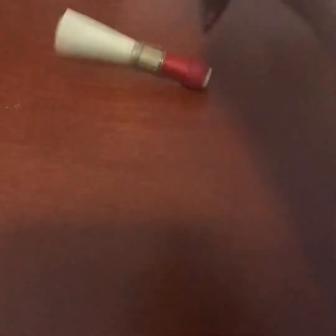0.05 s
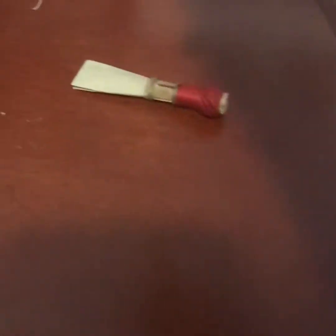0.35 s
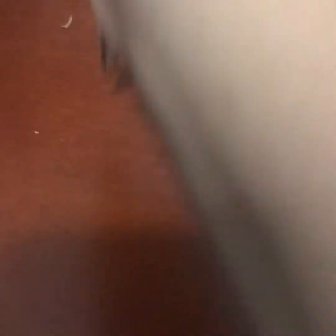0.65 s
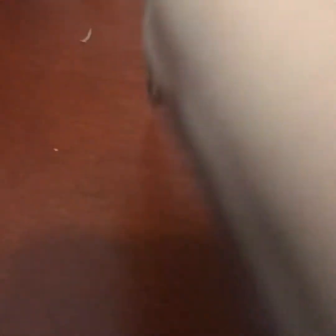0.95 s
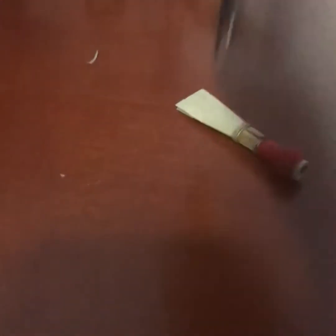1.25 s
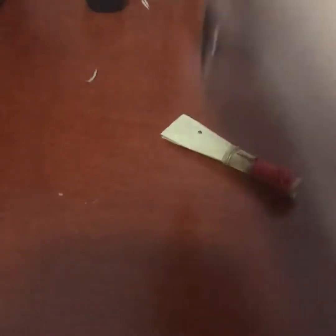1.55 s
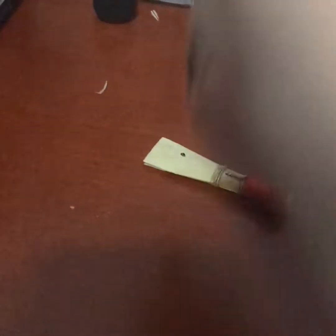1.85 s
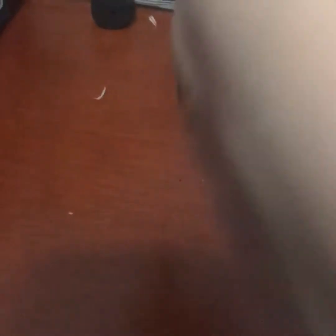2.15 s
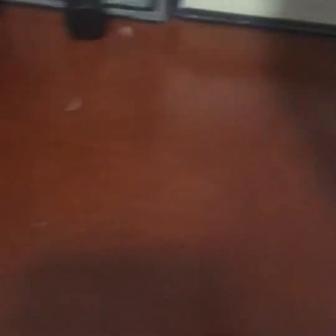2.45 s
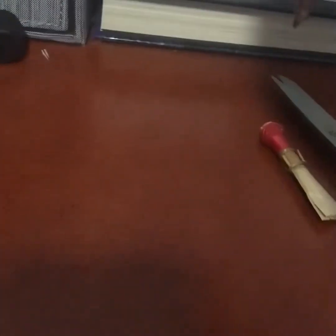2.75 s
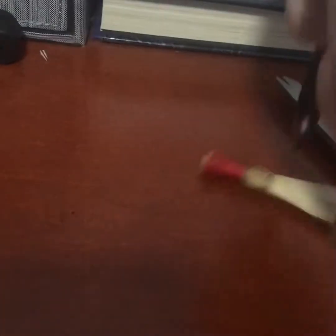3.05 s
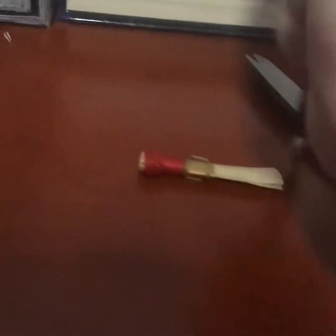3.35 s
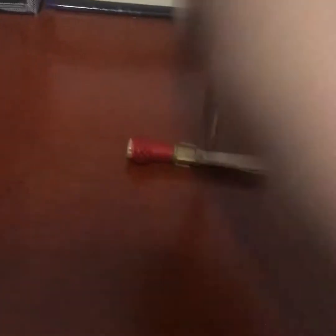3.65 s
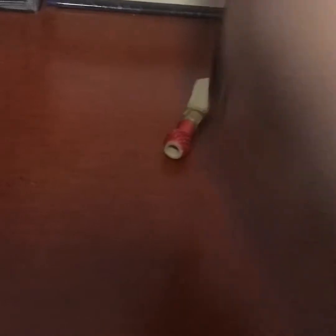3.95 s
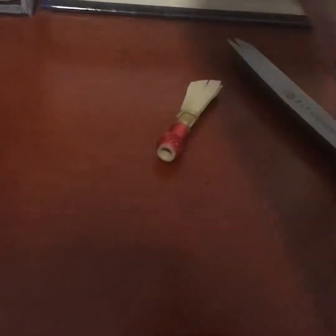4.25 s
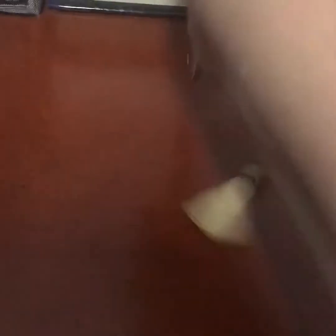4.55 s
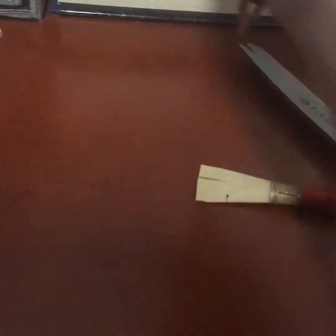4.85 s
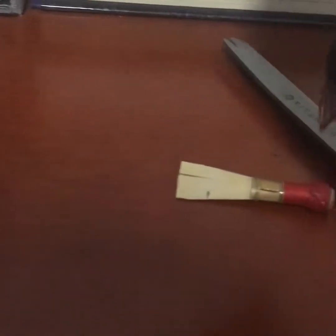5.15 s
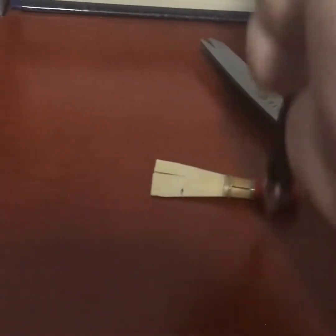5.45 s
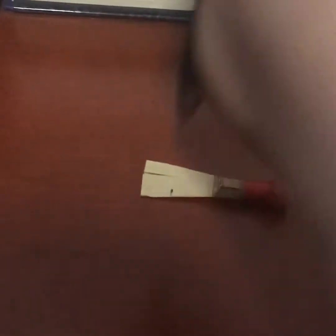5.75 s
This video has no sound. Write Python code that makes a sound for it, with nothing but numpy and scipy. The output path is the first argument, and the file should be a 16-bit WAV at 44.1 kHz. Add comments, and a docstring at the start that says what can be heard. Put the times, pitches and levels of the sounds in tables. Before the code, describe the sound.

Close, irregular cracks and hollow thumps as a metal tool strikes a light reed on a wooden tabletop, making it bounce and rattle.

```python
"""A hand jabs a steel tool down at a small wire-bound cane reed lying on a wooden desk, close to the microphone.
Each jab cracks on the cane, thumps the desk and rebounds once; the light reed then hops, rolls and skitters to rest.
A small room answers briefly, over a low rumble and a faint hiss that steps up and down."""
import sys
import numpy as np
from scipy import signal
from scipy.fft import rfft, irfft, next_fast_len
from scipy.io import wavfile
from scipy.ndimage import uniform_filter1d

SR = 44100
rng = np.random.default_rng(int(sys.argv[2]) if len(sys.argv) > 2 else 0)


def master_out(mix):
    """Clip the mix to full scale and print it as 16-bit PCM to the path in sys.argv[1]."""
    frames = np.transpose(np.atleast_2d(mix))
    ceiling = np.clip(frames, -1, 1)
    pcm = np.round(ceiling * 32767).astype(np.int16)
    wavfile.write(sys.argv[1], SR, pcm)


N = 260145

# desk modes: (Hz, dB, t60 s, polarity at the microphone)
DESK = [(49.7, -31.5, 0.24, 1), (70.4, -26.5, 0.13, -1), (108.7, -23, 0.106, -1), (164, -19, 0.047, 1),
        (240, -15, 0.019, 1), (323.2, -17.5, 0.06, 1), (379.5, -27, 0.13, -1), (394, -17.5, 0.061, -1),
        (450, -6, 0.011, -1), (615, -8, 0.014, -1), (641, -8.5, 0.022, 1), (805, -14.5, 0.0055, 1)]
# the reed's lasting ring: (Hz, dB, t60 s)
REED = [(3390, -18.5, 0.029), (3820, -21.5, 0.017), (4120, -14.5, 0.019)]
# the reed rocking between hops: (start s, end s, dB)
SKITTERS = [(.055, 0.18, -63), (0.19, 0.381, -59), (0.403, 0.484, -72), (0.68, 0.805, -65), (0.944, 0.988, -56.5), (1.406, 1.517, -56), (1.72, 1.833, -54), (2.015, 2.047, -47), (2.104, 2.322, -56), (3.781, 3.955, -58.5), (4.549, 4.718, -62)]
# spectrum of that rocking: (Hz, dB)
ROCKING = [(400, -5), (900, -8), (1400, -2.5), (1700, -8), (2400, -9), (3400, 6.5), (4250, 4), (5000, -21), (8000, -11.5), (11000, -16.5), (16000, -12)]
HISS = [(180, -42.5), (300, -11.5), (348, 3), (486, -2.5), (574, -4), (1080, -7), (6200, -11), (12900, -15), (16000, -12.5)]  # (Hz, dB)
RUMBLE = [(15, -37.5), (25, -7.5), (64, -1.5), (183, -14), (216, -20), (284, -13), (374, -22.5), (405, -16.5), (440, -24.5),
          (1200, -30.5), (1560, -60), (2640, -120)]  # (Hz, dB)
ROOM_DECAY = [(100, 0.39), (400, 0.3), (1200, 0.17), (4000, 0.29), (14000, 0.13)]  # (Hz, t60 s)
ROOM_COLOUR = [(60, -4), (200, 3), (400, -1), (900, 6.5), (1350, 2.5), (1650, 2.5), (2600, 0), (3800, -8), (5200, -4.5), (8000, -4.5), (11000, -7), (15000, 0)]  # (Hz, dB)
BANDS = [(800, 2400), (2400, 5000), (5000, 7600), (9200, 15600)]  # fixed; hollow, cane, edge and sparkle ranges: (low Hz, high Hz)
TOP_HZ = 16200  # fixed
# the desk top's quick upper modes, rung by any hard contact: (Hz, dB at the first spot, dB at the second spot, t60 s)
TOP_MODES = [(266, -8, -19, 0.13), (387, -8, -10.5, 0.14), (560, -10.5, -13, 0.022), (862, -11, -16, 0.05), (1028, -11, -19, .03),
             (1230, -15.5, -8.5, .025), (1340, -2, -22, 0.03), (1826, -13, -12.5, 0.024), (2366, -19.5, -11.5, 0.0053)]
# jabs that pin the reed to the desk: (s, thump dB, crack dB, cane pitch Hz, treble dB, tool's rebound after s, rebound dB)
JABS = [(0.6515, -4.5, -19, 3026, -5, 0.027, -32.5), (0.9973, -3.5, -22, 3020, 1, 0.025, -34.5), (1.3907, -16, -17.5, 3080, 4, 0.032, -45),
        (1.7031, -12.5, -19, 2520, 2.5, .037, -41.5), (2.0047, -2, -12, 4140, -5, 0.0093, -33.5), (2.3168, -4, -24.5, 3870, 1, 0.024, -49),
        (3.073, -0.55, -25, 2606, 2, 0.03, -43), (3.417, -1.2, -21.5, 4370, 1.5, 0.028, -35), (3.7664, -2, -24.5, 2420, 3, .027, -37.5),
        (4.0935, -1.1, -20.5, 2520, -2, 0.028, -37), (4.5353, -1, -20, 3360, -3, .0315, -40.5), (5.4821, -3, -21.5, 4280, -3, 0.034, -43)]
# glancing taps of the tool on the cane, often just ahead of a jab: (s, level dB, cane pitch Hz, treble dB)
TAPS = [(0.103, -19, 3730, -6.5), (0.1757, -18.5, 3020, -7.5), (0.6475, -23, 3723, -2), (0.9352, -29, 3990, -2),
        (1.699, -20.5, 3290, 4), (1.9977, -21.5, 3220, -5), (2.0011, -20, 4110, 1.5), (2.0969, -18, 3400, -7.5),
        (3.062, -22.5, 4370, -2), (3.7592, -15, 3500, -11), (4.5307, -28.5, 3460, 10)]
# the reed's louder landings: (s, level dB, cane pitch Hz, treble dB)
HOPS = [(0.0772, -39, 3340, -22), (0.207, -38, 3100, -17), (0.221, -35, 3000, -26), (0.2589, -28, 3980, -23), 
        (0.2778, -48, 4170, -4), (0.2953, -46.5, 4030, -3), (0.322, -48, 4150, 1), (0.3343, -33, 3970, -9),
        (0.3815, -39, 3720, -11), (0.719, -29, 3390, -5), (0.757, -31.5, 4110, -7), (0.776, -41, 4160, -4.5),
        (1.0636, -44, 3170, 0), (1.1791, -46.5, 3030, 0), (1.2576, -48, 4180, -4), (1.455, -39, 3200, -2),
        (1.475, -32, 3820, -13.5), (1.7715, -32, 3500, -4), (1.8174, -34.5, 3610, -9), (2.126, -30.5, 2815, -30),
        (2.174, -31, 2900, -12), (2.1992, -31, 2820, -31), (2.2535, -38.5, 2897, -26), (3.167, -36.5, 3900, -4.5),
        (3.8098, -25.5, 3680, -22), (3.8252, -34.5, 3750, -6), (3.8625, -42, 3670, 3), (3.9003, -40.5, 2586, -8),
        (4.5988, -45, 2450, -20), (4.6268, -45, 2440, -18), (4.6535, -45, 2420, -13), (4.6723, -47.5, 2464, -3)]
# the rolling reed tips over its wire collar and rings freely: (s, level dB)
ROLLS = [(3.1056, -36), (3.133, -36), (3.1949, -39), (3.209, -43), (3.2301, -39.5), (3.2547, -42.5),
         (3.2664, -47), (3.2769, -49.5), (4.5852, -41.5), (4.7092, -44), (4.7173, -50), (4.7399, -50), (4.757, -58)]
# colour of each kind of contact, relative to the cane: (hollow dB, edge dB, sparkle dB, glint Hz)
JAB_COLOUR, REBOUND_COLOUR, TAP_COLOUR = (-2.2, -4.5, -2, 10199), (-3, -1.5, 5, 9200.5), (-12, -6.5, 0, 10799.5)
HOP_COLOUR, ROLL_COLOUR = (-5.5, 0, -1.5, 10501), (-12, -15.5, 1.5, 13900)
# how freely the cane rings: 0 = pinned under the tool, 1 = in mid-air
REBOUND_FREEDOM, TAP_FREEDOM, HOP_FREEDOM, ROLL_FREEDOM = 0.31, 0.83, 0.63, 0.89
FREE_HZ = 3290  # the cane's pitch when loose
HOLLOW_DB_PER_OCTAVE = 24.5  # the flatter a landing, the lower its pitch and the more it raps the desk
# tiny bounces while the reed rocks: mean gap (s), level over the rocking (dB), colour as above
BOUNCE_GAP_S, BOUNCE_DB, BOUNCE_COLOUR = .014, 7.5, (1.5, -7.5, 1.5, 11200)
# the hiss is raised during these spans: (start s, end s)
HISS_RAISED = [(0, .39), (.645, 2.725), (3.06, 3.28), (3.415, 4.5), (4.53, 4.76), (5.48, 6)]  # fixed
# sharp little ticks of steel on the reed's wire: (s, level dB, pitch Hz)
TICKS = [(0.2392, -29, 11400), (0.9465, -39, 11000), (1.7085, -20, 11500), (1.714, -17, 13500), (1.7547, -37.5, 10000),
         (2.2131, -37, 13500), (2.242, -42, 13500), (4.605, -43, 12000), (4.6835, -37, 12500)]
JAB_HOLLOW_DB = -16.5  # a jab's hollow rap follows its thump, this far under it
MOVED_S = 2.7  # the reed lies on another spot of the desk from here on
RUMBLE_LEVEL = [(0.1, -58), (0.54, -65.5), (1.27, -57), (1.48, -63.5), (2.3, -57), (2.72, -65.5), (3.62, -60),
                (5.43, -66), (5.66, -61.5), (5.8, -63)]  # (s, level of the rumble dB)
RUMBLE_DB = None
HISS_LOW_DB, HISS_HIGH_DB = -71.5, -61.5
JAB_FREEDOM = 0.18  # the tool holds the cane almost still


def amp(db):
    """Decibels to gain."""
    return 10 ** (np.asarray(db) / 20)


def unit(x):
    """Scale to rms 1."""
    return x / np.sqrt(np.mean(x ** 2) + 1e-20)


def burst(x):
    """Scale to the energy of one millisecond at rms 1."""
    return x * np.sqrt(SR / 1000 / (np.sum(x ** 2) + 1e-20))  # fixed


def along(points, hz):
    """(Hz, value) points on a log axis."""
    f, v = np.transpose(points)
    return np.interp(np.log(hz + 1), np.log(f + 1), v)


def fade(t, t60):
    """Exponential decay, 60 dB down after t60."""
    return np.exp(-np.log(1000) * t / t60)


def add(track, s, sound):
    """Mix a sound into a track at time s."""
    part = track[max(round(s * SR), 0):][:len(sound)]
    part += sound[:len(part)]


def filtered(x, gain):
    """x times a gain that depends on frequency."""
    size = next_fast_len(N + SR // 2)
    return irfft(rfft(x, size) * gain(np.fft.rfftfreq(size, 1 / SR)), size)[:N]


def coloured(x, spectrum):
    """x shaped by (Hz, dB) points, at rms 1."""
    return unit(filtered(x, lambda hz: amp(along(spectrum, hz))))


def in_room(sound, wet_db, delay=0.0055, build=0.0047):
    """A sound followed by its own diffuse room tail."""
    hz, t, z = signal.stft(rng.standard_normal(SR // 3), SR, nperseg=256)
    z = z * fade(t, along(ROOM_DECAY, hz)[:, None]) * amp(along(ROOM_COLOUR, hz))[:, None]
    tail = signal.istft(z * (1 - np.exp(-t / build)), SR, nperseg=256)[1]
    response = np.pad(amp(wet_db) * tail / np.linalg.norm(tail), (round(delay * SR), 0))
    response[0] += 1
    return signal.fftconvolve(sound, response)


def desk(level_db=0, contact=0.00046, lag=0.00045, scatter_db=1, top_db=-15, wet_db=-20):
    """Every blow sets the same board modes going: a short hollow thump."""
    track, t = np.zeros(N), np.arange(SR // 2) / SR
    for s, db, *_ in JABS:
        thump = sum(np.sign(polarity) * amp(level + rng.normal(0, scatter_db)) * np.sin(2 * np.pi * hz * t) * fade(t, t60)
                    for hz, level, t60, polarity in DESK)
        # the cane cushions the blow, so the push builds over the contact time
        push = thump * (1 - np.exp(-t / contact))
        add(track, s + lag, in_room(amp(db + level_db) * (push + amp(top_db) * ring(top_modes(s), t, scatter_db=2, detune=.006)), wet_db))
    return track




def skitter(rate=170, spread_db=4, tick_t60=0.016, dying_db=-7):
    """The reed rocks on the desk in tiny irregular ticks that weaken as it settles."""
    track, t = np.zeros(N), np.arange(SR // 40) / SR
    for start, end, db in SKITTERS:
        size = max(round((end - start) * SR), len(t))
        ticks = (rng.random(N) < rate / SR)[:size] * amp(spread_db * rng.standard_normal(N)[:size])
        envelope = signal.fftconvolve(ticks, fade(t, tick_t60))[:size] * amp(np.linspace(0, dying_db, size))
        add(track, start, amp(db) * unit(envelope))
    return in_room(track * coloured(rng.standard_normal(N), ROCKING), wet_db=-19.5)[:N]


def background(rumble_db=3):
    """Low room rumble, and a hiss that steps between two levels."""
    t = np.arange(N) / SR
    raised = sum((t >= start) & (t < end) for start, end in HISS_RAISED)
    hiss_db = uniform_filter1d(np.where(raised, float(HISS_HIGH_DB), HISS_LOW_DB), size=500)
    hiss = amp(hiss_db) * coloured(rng.standard_normal(N), HISS)
    rumble = amp(np.interp(t, *np.transpose(RUMBLE_LEVEL)) + rumble_db) * coloured(rng.standard_normal(N), RUMBLE)
    return hiss + rumble


def ring(modes, t, scatter_db=3.5, detune=0.012):
    """A table of modes, struck at a new spot each time."""
    return sum(amp(db + rng.normal(0, scatter_db)) * burst(np.sin(2 * np.pi * hz * rng.normal(1, detune) * t) * fade(t, t60))
               for hz, db, t60 in modes)


def crack(band, t, t60):
    """A dying burst of noise between two frequencies."""
    sos = signal.butter(3, np.clip(band, 50, SR / 2 - 50), "bandpass", fs=SR, output="sos")  # fixed
    return burst(signal.sosfilt(sos, rng.standard_normal(len(t)) * fade(t, t60)))


def cane(hz, freedom, t, pinned_t60=0.0068, free_t60=0.047, width=0.11, crack_t60=0.0099):
    """Pinned, the cane only cracks; the freer it is, the purer and longer its pitch."""
    free = np.clip(freedom, 0, 1)
    hang = free ** 4  # fixed; the lightest touch already damps the ring
    pitch = burst(np.sin(2 * np.pi * hz * t) * fade(t, pinned_t60 + hang * free_t60))
    clack = crack([hz / (1 + width), hz * (1 + width)], t, crack_t60)
    # the three shares always sum to the same energy
    return free * pitch + np.sqrt(2 * free * (1 - free)) * clack + (1 - free) * crack(BANDS[1], t, crack_t60)


def contact(s, db, hz, freedom, colour, treble_db=0, rap_db=0, hollow_t60=0.021, edge_t60=0.012, sparkle_t60=0.01, thud_db=-3, wood_db=-4, wet_db=-18):
    """Each contact sounds the cane, raps the desk top and adds a short treble snap."""
    t = np.arange(SR // 12) / SR
    hollow_db, edge_db, sparkle_db, glint_hz = colour
    wood = amp(hollow_db + rap_db) * (amp(thud_db) * crack(BANDS[0], t, hollow_t60) + amp(wood_db) * ring(top_modes(s), t))
    snap = amp(edge_db) * crack(BANDS[2], t, edge_t60) + amp(sparkle_db) * sparkle(glint_hz, t, sparkle_t60)
    return in_room(amp(db) * (cane(hz, freedom, t) + ring(REED, t) + wood + amp(treble_db) * snap), wet_db)


def tool():
    """The tool glances off the cane, or cracks down on it and rebounds once."""
    track = np.zeros(N)
    for s, thump_db, db, hz, treble_db, rebound_s, rebound_db in JABS:
        add(track, s, contact(s, db, hz, JAB_FREEDOM, JAB_COLOUR, treble_db, thump_db + JAB_HOLLOW_DB - db))
        add(track, s + rebound_s, contact(s, rebound_db, FREE_HZ, REBOUND_FREEDOM, REBOUND_COLOUR))
    for s, db, hz, treble_db in TAPS:
        add(track, s, contact(s, db, hz, TAP_FREEDOM, TAP_COLOUR, treble_db))
    return track


def loose_reed():
    """The loose reed clacks down on its cane and pings as it rolls."""
    track = np.zeros(N)
    for s, db, hz, treble_db in HOPS:
        flat_db = HOLLOW_DB_PER_OCTAVE * np.log2(FREE_HZ / hz)
        add(track, s, contact(s, db, hz, HOP_FREEDOM, HOP_COLOUR, treble_db, flat_db))
    for s, db in ROLLS:
        add(track, s, contact(s, db, FREE_HZ, ROLL_FREEDOM, ROLL_COLOUR))
    return track


def bounces(uneven=.3, spread_db=6.0, dying_db=-5, low_hz=2800, high_hz=4200):
    """Between its landings the reed makes tiny bounces, each on a new spot, that weaken as it settles."""
    track = np.zeros(N)
    for start, end, db in SKITTERS:
        draws = rng.standard_normal((40, 3))  # fixed
        times = start + np.cumsum(BOUNCE_GAP_S * np.exp(uneven * draws[:, 0]))
        for s, (_, size, spot) in zip(times[times < end], draws):
            level = db + BOUNCE_DB + spread_db * size + dying_db * (s - start) / (end - start)
            add(track, s, contact(s, level, np.interp(spot, [-1, 1], [low_hz, high_hz]), HOP_FREEDOM, BOUNCE_COLOUR))
    return track


def top_modes(s):
    """The desk top's modes as heard from the spot where the reed lies at time s."""
    return [(hz, first_db if s < MOVED_S else second_db, t60) for hz, first_db, second_db, t60 in TOP_MODES]


def sparkle(glint_hz, t, t60, glint_db=0, width=0.091, scatter=0.2):
    """Top-octave snap with a narrow glint whose pitch shifts a little each time."""
    hz = glint_hz * np.exp(scatter * rng.standard_normal())
    return burst(crack(BANDS[3], t, t60) + amp(glint_db) * crack([hz / (1 + width), hz * (1 + width)], t, t60))


def wire_ticks(width=.13, t60=.012, spray_db=-12, wet_db=-15):
    """Steel on wire: a high, narrow tick with a little broad spray and no body."""
    track, t = np.zeros(N), np.arange(SR // 30) / SR
    for s, db, hz in TICKS:
        tick = crack([hz / (1 + width), hz * (1 + width)], t, t60) + amp(spray_db) * crack([BANDS[1][0], TOP_HZ], t, t60)
        add(track, s, in_room(amp(db) * tick, wet_db))
    return track


def scene():
    """Thumps, clicks and skittering over the room's background."""
    return (background() + desk() + tool() + wire_ticks() + loose_reed() + skitter() + bounces())[None]


def record(dry):
    """The recorder drops the deepest rumble, softens the top octave and keeps nothing above its band limit."""
    low_cut = lambda hz: 1 - 1 / (1 + (hz / 25) ** 8)  # fixed
    softening = lambda hz: amp(along([(11000, 0), (14000, -1.5)], hz))  # fixed
    return filtered(dry[0], lambda hz: low_cut(hz) * softening(hz) / (1 + (hz / TOP_HZ) ** 160))[None]  # fixed


dry = scene()
out = record(dry)
master_out(out)
```